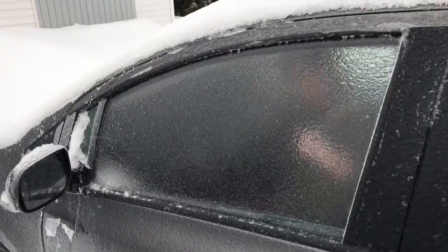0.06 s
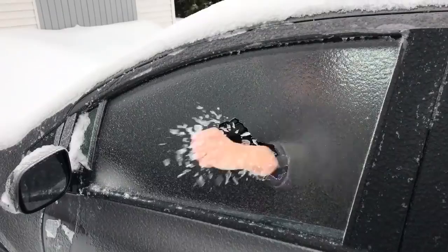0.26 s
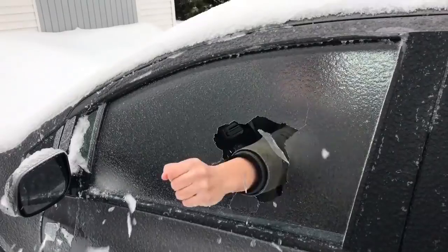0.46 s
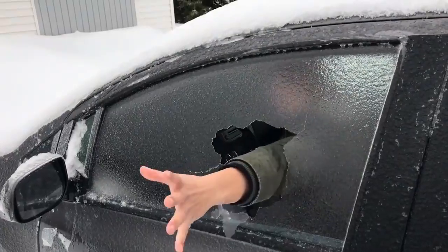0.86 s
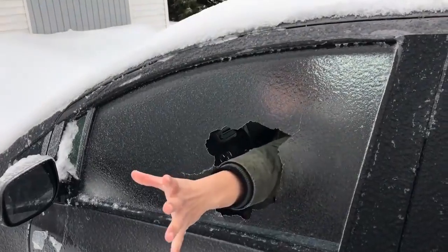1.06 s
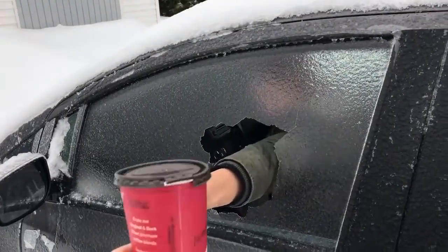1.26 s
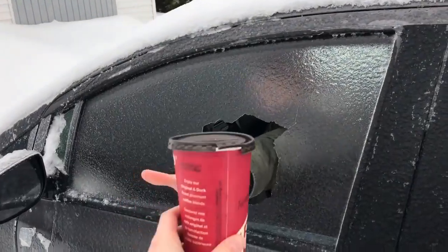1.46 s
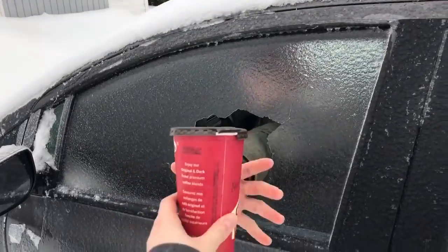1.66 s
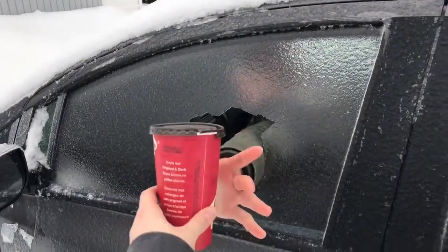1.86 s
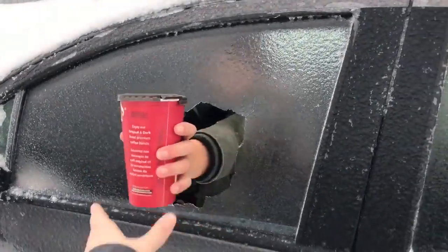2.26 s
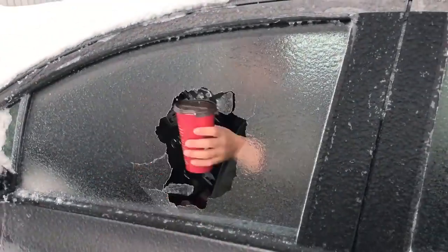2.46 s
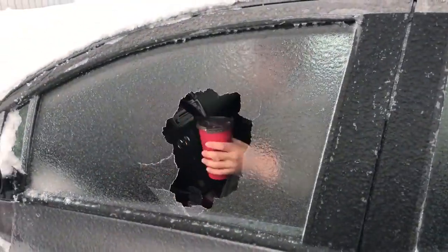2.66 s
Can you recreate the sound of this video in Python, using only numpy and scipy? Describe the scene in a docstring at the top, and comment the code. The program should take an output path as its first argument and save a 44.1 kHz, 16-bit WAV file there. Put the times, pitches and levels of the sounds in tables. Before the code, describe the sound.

A sheet of ice smashes, fragments fall tinkling, then more ice breaks off.

```python
"""Outdoors in winter, over a distant rumble, a fist punches a sheet of ice in an open car window.
The sheet cracks and thumps, and the door booms briefly. Fine crumbs of ice hiss while shards
clatter and tinkle down the door. Near the two-second mark the sleeve brushes the hole. Then the
arm pulls a paper cup back through, breaking off more ice, and the cup knocks against the rim."""
import sys
import numpy as np
from scipy import signal
from scipy.fft import rfft, irfft
from scipy.io import wavfile

SR = 44100
rng = np.random.default_rng(int(sys.argv[2]) if len(sys.argv) > 2 else 0)


def generate_wav(sig):
    """Save sig (samples, or channels by samples) to the path in sys.argv[1] as 16-bit PCM at SR."""
    pcm = np.round(np.clip(np.atleast_2d(sig).T, -1, 1) * 32767).astype(np.int16)
    wavfile.write(sys.argv[1], SR, pcm)


N = 123479
EVENT_SIZE = SR // 4  # samples in one hit
T = np.arange(N) / SR
AGE = np.arange(EVENT_SIZE) / SR  # seconds since a hit began
LEAD_S, SHARD_RISE_S = .008, 0.0012  # room before a snap; how quickly a shard's clicks build up
CUTOFF_HZ = 15900


def from_db(db):
    """Turn decibels into a number to multiply by."""
    return 10 ** (np.asarray(db) / 20)


def rms_one(x):
    """Scale a sound so that its average strength (rms) is 1."""
    return x / np.sqrt(np.mean(x ** 2) + 1e-20)


def unit_hit(x):
    """Scale a hit to the energy of 10 ms at an rms of 1."""
    return x * np.sqrt(.01 * SR / (np.sum(x ** 2) + 1e-20))


def band(x, low_hz, high_hz):
    """Keep mainly what lies between two frequencies."""
    edges = np.clip([low_hz, high_hz], 10, .47 * SR)
    return signal.sosfilt(signal.butter(2, edges, "band", fs=SR, output="sos"), x + 1e-18)


def coloured(x, points):
    """Shape the lows and highs of a steady sound, then scale it to an rms of 1."""
    hz, db = np.transpose(points)
    log_f = np.log(np.fft.rfftfreq(N, 1 / SR) + 1)
    return rms_one(irfft(rfft(x) * from_db(np.interp(log_f, np.log(hz), db)), N))


def modes(hz, gains, t60):
    """The tones of a struck object. Each fades by 60 dB in its ring time, t60 seconds."""
    hz, gains, t60 = (np.reshape(v, (-1, 1)) for v in (hz, gains, t60))
    return np.sum(gains * np.sin(2 * np.pi * hz * AGE) * np.exp(-np.log(1000) * AGE / t60), axis=0)


def through(x, response):
    """Let every sample of a sound set off the given ring or echo."""
    return signal.fftconvolve(x, response)[:len(x)]


def add(out, s, x):
    """Mix a sound in, starting at s seconds."""
    i = int(s * SR)
    out[i:i + len(x)] += x[:N - i]


def outdoors():
    """A steady distant rumble with a low, slightly wavering hum."""
    # Each row: frequency in Hz, relative level of the rumble in dB.
    rumble_colour = [(20, -34), (33, -4), (58, 3), (82, -5), (150, -7), (270, -8), (450, -17.5),
                     (1000, -19), (2500, -30.5), (6000, -38.5), (16000, -60)]
    hum_hz = 114.3
    waver = rms_one(band(rng.standard_normal(N), hum_hz - 4, hum_hz + 4))
    hum = np.sqrt(2) * np.sin(2 * np.pi * hum_hz * T) + 0.11 * waver
    return from_db(-56) * coloured(rng.standard_normal(N), rumble_colour) + from_db(-59.5) * hum


def crackle(rise_s, decay_s, snap=1):
    """Tiny cracks build up to one click of size snap, then die away."""
    clicks_per_s = 11000
    clicks = (rng.random(EVENT_SIZE) < clicks_per_s / SR) * rng.standard_normal(EVENT_SIZE)
    clicks[int(LEAD_S * SR)] = snap
    since_snap = AGE - LEAD_S
    fade_s = np.maximum(np.where(since_snap < 0, rise_s, decay_s), 1e-4)
    return clicks * np.exp(-np.abs(since_snap) / fade_s)


def bend(x):
    """Sound crosses a plate as bending waves, so low tones arrive later than high ones."""
    delay_s = 0.000926  # at 1000 Hz
    hz = np.fft.rfftfreq(2 * EVENT_SIZE, 1 / SR)
    phase = 4 * np.pi * delay_s * np.sqrt(1000 * hz)
    return irfft(rfft(x, 2 * EVENT_SIZE) * np.exp(-1j * phase))[:EVENT_SIZE]


def ice_hit(clicks, thump_hz, knock_hz, ring_hz, thump_db, knock_db, ring_db, sparkle_db):
    """Clicks thump the sheet and door, knock on the ice plate and make a piece ring and sparkle."""
    # Low tones of sheet and door. Each row: pitch in Hz, relative level in dB, ring time in seconds.
    panel_tones = [(91, -2, 0.1), (133, -6, 0.093), (174.8, -0.5, 0.062), (208, -3.5, 0.053),
                   (275, -0.5, 0.041), (315.4, 1, 0.03), (408, -4, 0.035)]
    piece_hz = rng.uniform(2300, 15500, size=16)
    piece_gains = from_db(-28.5) * piece_hz / ring_hz * rng.standard_normal(len(piece_hz))
    piece = clicks + through(clicks, modes(piece_hz, piece_gains, t60=21 / piece_hz))  # 21 cycles
    plate_hz = rng.uniform(450, 2000, size=10)
    plate_gains = from_db(-45) * rng.standard_normal(len(plate_hz))
    plate = clicks + through(clicks, modes(plate_hz, plate_gains, t60=0.049))
    hz, db, t60 = np.transpose(panel_tones)
    panel_gains = from_db(db + rng.normal(0, 2, len(hz))) * rng.choice([-1, 1], len(hz))
    panel = through(clicks, modes(hz, panel_gains, t60))
    thump = from_db(thump_db) * unit_hit(band(panel, thump_hz / 2, thump_hz * 2))
    knock = from_db(knock_db) * unit_hit(band(plate, knock_hz / 2.2, knock_hz * 2.2))
    ring = from_db(ring_db) * unit_hit(band(piece, ring_hz / 1.8, ring_hz * 1.8))
    sparkle = from_db(sparkle_db) * unit_hit(band(piece, 11400, CUTOFF_HZ))
    return bend(thump + knock + ring + sparkle)


def sheet_cracks():
    """The sheet cracks under the fist, and later under the returning hand and cup."""
    # Each row: time in seconds, crackle fade in seconds, then thump, knock, ring and sparkle in dB.
    cracks = [ (0.2317, 0.001, -31, -17, -21.5, -35), (0.2343, 0.00095, -20.5, -20, -35, -27.5),
              (0.2365, 0.0021, -21.5, -23.5, -29, -34), (.249, 0.015, -26, -28.5, -33, -35),
              (.272, 0.012, -35, -39.5, -40.5, -36.5), (2.234, 0.0013, -33, -39.5, -50.5, -45),
              (2.245, 0.001, -28, -37.5, -40.5, -44.5), (2.2685, 0.0026, -33, -40.5, -66, -55),
              (2.290, 0.0046, -28.5, -44, -59, -64), (2.4302, 0.0011, -34, -27.5, -28.5, -32.5),
              (2.4376, 0.005, -45, -34.5, -33.5, -51), (2.447, 0.011, -27.5, -29, -25.5, -37),
              (2.4537, 0.004, -50, -24.5, -24.5, -30.5), (2.460, 0.0066, -23, -22.5, -21.5, -33),
              (2.471, 0.0089, -26.5, -27, -27, -30)]
    thump_hz, knock_hz, ring_hz = 195, 1004, 3100
    out = np.zeros(N)
    for s, decay_s, *levels in cracks:
        clicks = crackle(rise_s=0.00042, decay_s=decay_s, snap=2.47)
        add(out, s - LEAD_S, ice_hit(clicks, thump_hz, knock_hz, ring_hz, *levels))
    return out


def fist():
    """The punch rings the whole sheet and sets the door booming briefly."""
    # Each row: pitch in Hz, level in dB, ring time in seconds.
    punch_tones = [(60.6, -25, 0.46), (305, -18, 0.018), (1050, -22.5, 0.053), (1485, -10, 0.025)]
    out = np.zeros(N)
    hz, db, t60 = np.transpose(punch_tones)
    add(out, s=.2325, x=modes(hz, from_db(db), t60))
    return out


def patter(per_s):
    """Random ticks, mostly small, a few large."""
    size_db = 4 * np.minimum(rng.exponential(1, N), 5)
    ticks = from_db(size_db) * rng.choice([-1, 1], N)
    return ticks * (rng.random(N) < per_s / SR)


def crumbs():
    """Thousands of tiny falling grains of ice blur into a fine hiss."""
    # Each row: time in seconds, level of the hiss in dB.
    flow = [(.225, -76), (.245, -27), (.31, -53.5), (.40, -43.5), (.49, -52), (.6, -58), (.72, -57),
            (.75, -39.5), (.87, -42.5), (1.0, -46.5), (1.12, -52), (1.2, -52.5), (1.37, -57.5),
            (1.65, -63.5), (2.2, -70.5), (2.27, -52), (2.41, -71), (2.47, -27), (2.52, -53), (2.62, -49.5),
            (2.77, -56)]
    # Each row: frequency in Hz, relative level in dB.
    crumb_colour = [(150, -7), (500, -1), (1200, -0.5), (2500, 2), (5000, -1), (9500, -0.5), (14000, 0)]
    loudness = from_db(np.interp(T, *np.transpose(flow)))
    return loudness * coloured(patter(per_s=9000), crumb_colour)


def shards():
    """Shards strike the door and each other. One that thumps more than it rings is bigger and lower."""
    # Each row: time in seconds, crackle fade in seconds, then thump, knock, ring and sparkle in dB.
    strikes = [ (0.327, 0.012, -51, -35.5, -39, -38), (0.339, 0.005, -36.5, -38.5, -39, -42),
               (.382, 0.003, -41, -47, -45, -53), (0.4091, 0.0016, -41.5, -43.5, -37.5, -41.5),
               (.434, 0.0035, -40.5, -39.5, -43.5, -43.5), (.521, 0.0039, -43, -41, -49, -57),
               (0.5642, 0.0013, -34, -42.5, -43, -55), (0.5904, 0.0009, -37, -38.5, -40, -57),
               (0.599, 0.0022, -43, -51, -43.5, -61), (0.623, 0.0023, -46.5, -48.5, -37.5, -38.5),
               (.697, 0.0091, -69, -58.5, -45, -41.5), (0.7328, 0.00067, -39.5, -38.5, -37.5, -40.5),
               (0.7665, 0.0027, -68, -55, -38.5, -34), (.791, 0.0016, -33.5, -36.5, -33, -34),
               (0.8246, 0.0041, -46.5, -51, -36, -30.5), (.844, 0.01, -42, -40.5, -45, -42),
               (0.8807, 0.0014, -55, -45, -32, -29.5), (0.906, 0.017, -63, -58, -39.5, -32.5),
               (.954, 0.0019, -47, -40.5, -27.5, -29.5), (.986, 0.0012, -46, -36, -29, -31),
               (.995, 0.015, -45.5, -37.5, -45.5, -41), (1.154, 0.027, -76, -58, -37, -34.5),
               (1.177, 0.012, -62, -71, -37.5, -35), (1.294, 0.0021, -68, -74, -49.5, -44),
               (1.3103, 0.0024, -56.5, -49.5, -42.5, -35.5), (2.529, 0.0023, -42, -43.5, -44, -47),
               (2.551, 0.039, -62, -41.5, -38.5, -41), (2.6084, 0.0033, -59, -46, -40, -57)]
    base_hz = np.array([249, 806, 3570])  # thump, knock, ring
    out = np.zeros(N)
    for s, decay_s, thump_db, knock_db, ring_db, sparkle_db in strikes:
        octaves_up = (ring_db - thump_db) / 60
        clicks = crackle(SHARD_RISE_S + decay_s / 10, decay_s)
        hit = ice_hit(clicks, *(base_hz * 2 ** octaves_up), thump_db, knock_db, ring_db, sparkle_db)
        add(out, s - LEAD_S, hit)
    return out


def tinkles():
    """Small loose plates of ice click on contact and ring briefly at their own pitch."""
    # Each row: start in seconds, pitch in Hz, level of the lowest tone in dB.
    notes = [ (0.652, 6570, -37.5), (.744, 6578, -30), (0.846, 1140, -34), (.881, 7200, -22),
             (.908, 2875, -31.5), (.987, 5560, -24), (1.2942, 4016, -37), (1.3108, 3680, -31.5),
             (1.401, 807, -40.5), (1.545, 1050, -44.5), (1.796, 1780, -50), (2.4302, 8100, -19.5),
             (2.551, 2300, -37.5), (2.582, 1690, -30.5), (2.664, 2580, -39)]
    # The tones of one piece, as multiples of its pitch.
    ratios = [1, 1.73, 2.33]
    ring_s, click_boost_db = 0.021, 4.5
    overtone_db = -11 * np.arange(len(ratios))
    out = np.zeros(N)
    for s, hz, db in notes:
        add(out, s, modes(hz * np.array(ratios), from_db(db + overtone_db), ring_s))
        click = band(crackle(SHARD_RISE_S, ring_s / 10), hz / 2, hz * 2)
        add(out, s - LEAD_S, from_db(db + click_boost_db) * bend(click / np.abs(click).max()))
    return out


def sleeve():
    """Cloth swishes over the ice in many tiny slips, and the edge of the hole rings faintly."""
    # Each row: middle of a swish in seconds, rough half length in seconds, level in dB.
    swishes = [(1.941, 0.033, -54.5), (2.112, 0.0084, -49.5), (2.159, 0.017, -48.5)]
    # Each row: frequency in Hz, relative level in dB.
    cloth_colour = [(600, 1.5), (1500, -4.5), (5000, 0), (8000, -5), (12000, -14.5)]
    pressure = sum(from_db(db) * np.exp(-((T - s) / half) ** 2 / 2) for s, half, db in swishes)
    slips = patter(per_s=2500)
    edge_ring = through(slips, modes(hz=[644, 2770, 4520], gains=from_db(-37.5), t60=0.023))
    return pressure * coloured(slips + edge_ring, cloth_colour)


def cup():
    """The paper cup meets the rim of the hole with one short, hollow knock."""
    # Each row: pitch in Hz, relative level in dB, ring time in seconds.
    cup_tones = [(460, -0.5, 0.014), (846, 8.5, 0.01), (1090, -4, 0.018), (2550, 0, 0.018)]
    out = np.zeros(N)
    hz, db, t60 = np.transpose(cup_tones)
    knock = modes(hz, from_db(db - 20.5), t60)
    add(out, s=2.5714, x=band(knock, 350, 1630))
    return out


def scatter(x):
    """Sound bounces off the car and nearby walls, leaving a short tail that is longest in the bass."""
    # Each row: low edge in Hz, high edge in Hz, relative level in dB, ring time in seconds.
    echo_bands = [(93, 395, -11.5, 0.36), (394, 2640, -13, 0.15), (2260, 25000, -13.5, 0.077)]
    response = 0
    for low_hz, high_hz, db, t60 in echo_bands:
        tail = rng.standard_normal(EVENT_SIZE) * np.exp(-np.log(1000) * AGE / t60)
        response = response + from_db(db) * band(tail / np.linalg.norm(tail), low_hz, high_hz)
    return through(x, response)


def scene():
    """Mix everything into one channel. Only the punch, cracks, shards and tinkles echo."""
    hits = sheet_cracks() + fist() + shards() + tinkles()
    return (hits + scatter(hits) + cup() + crumbs() + sleeve() + outdoors())[None]


def record(dry):
    """Round off the peaks, fade out quickly at the end and cut the highest treble."""
    end_s, fade_s = 2.768, .004
    fade_out = np.clip((end_s - T) / fade_s, 0, 1)
    treble_cut = signal.ellip(10, .1, 80, CUTOFF_HZ, fs=SR, output="sos")
    return signal.sosfilt(treble_cut, fade_out * np.tanh(dry))


dry = scene()
out = record(dry)
generate_wav(out)
```